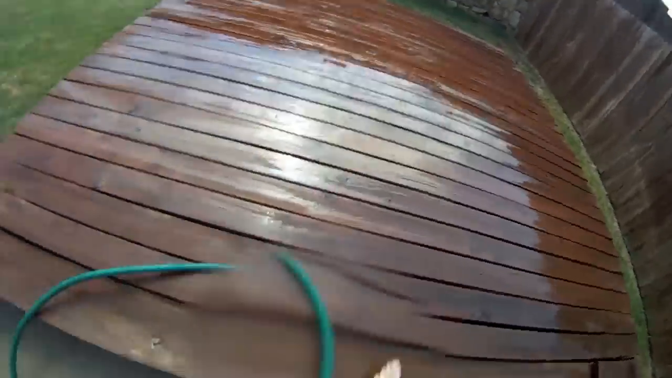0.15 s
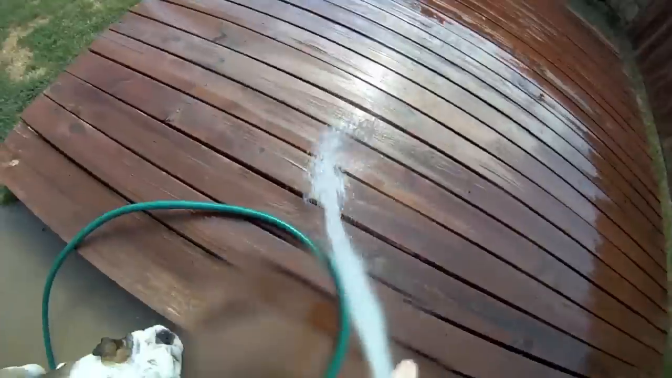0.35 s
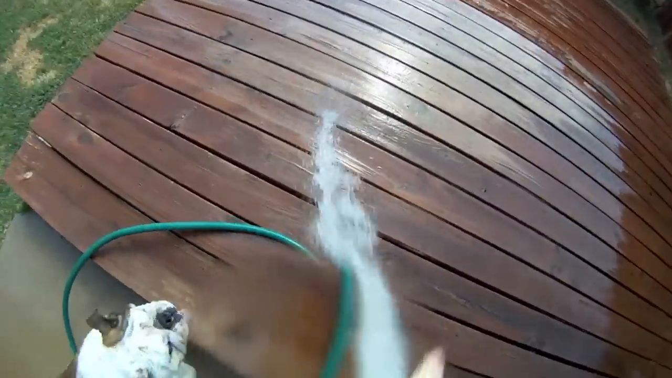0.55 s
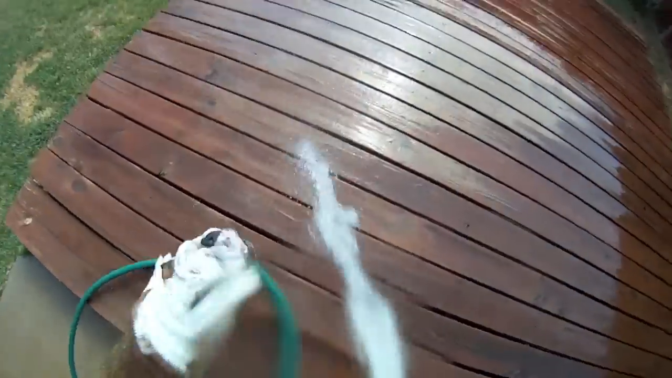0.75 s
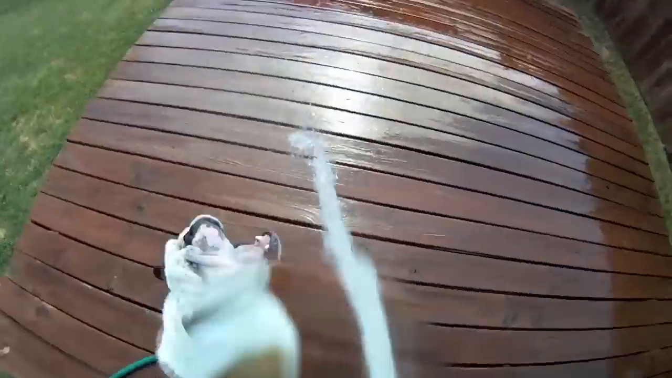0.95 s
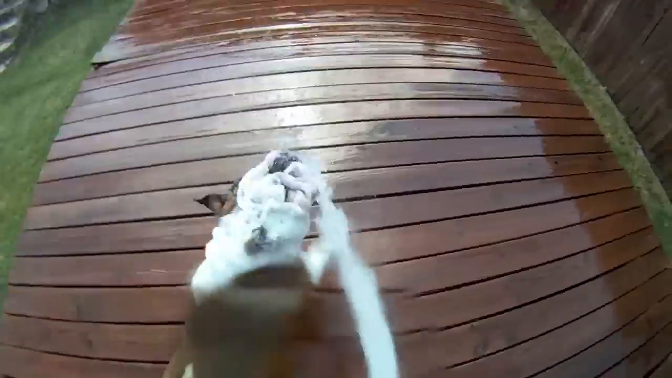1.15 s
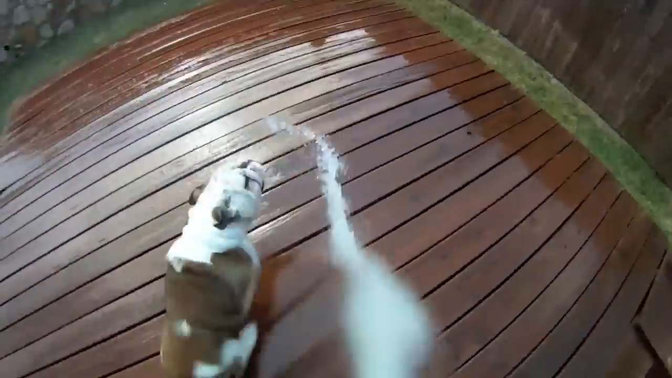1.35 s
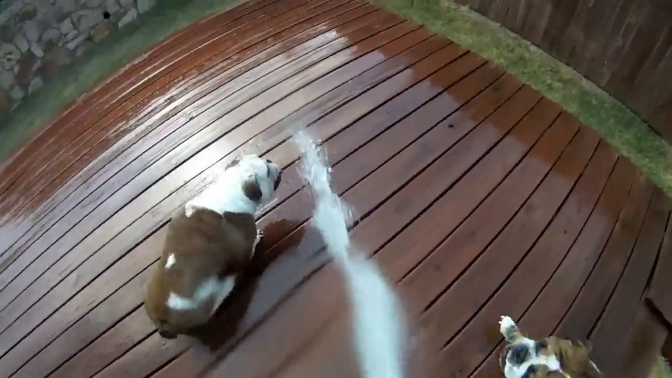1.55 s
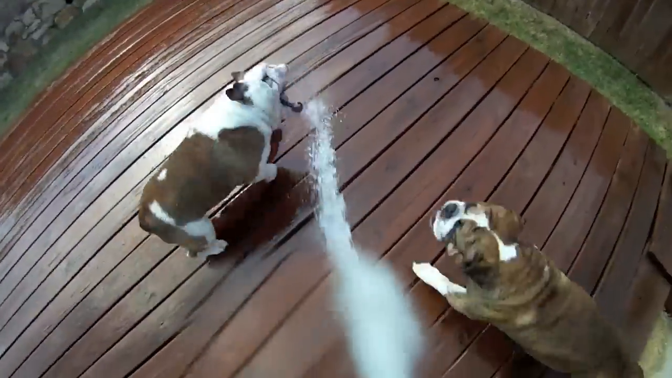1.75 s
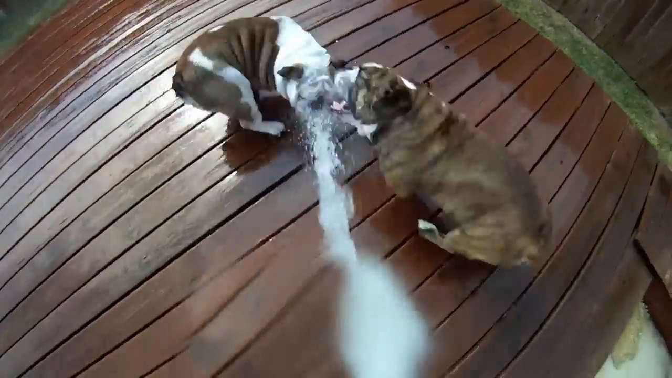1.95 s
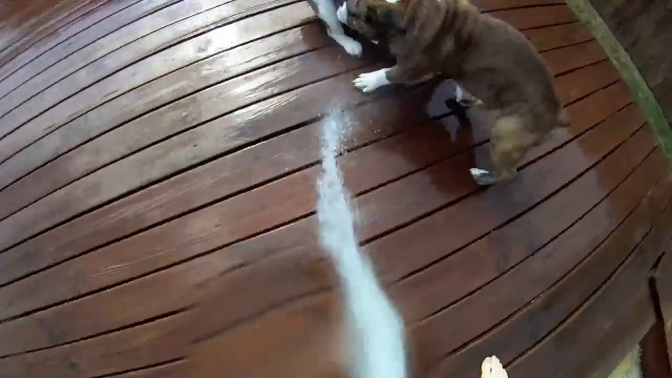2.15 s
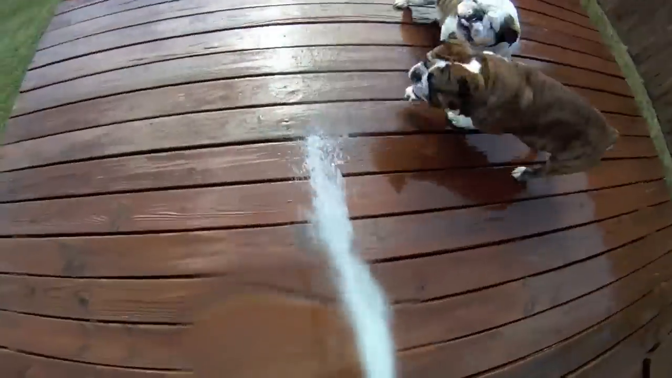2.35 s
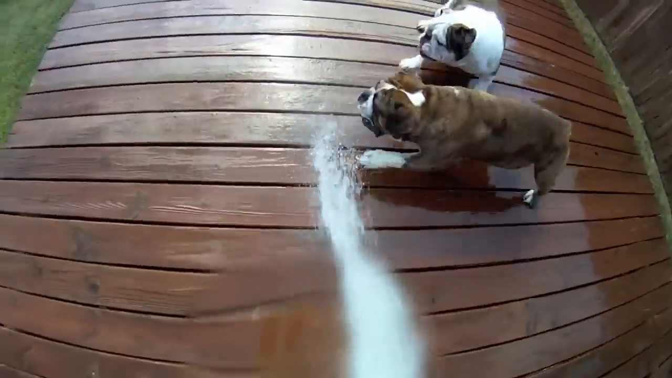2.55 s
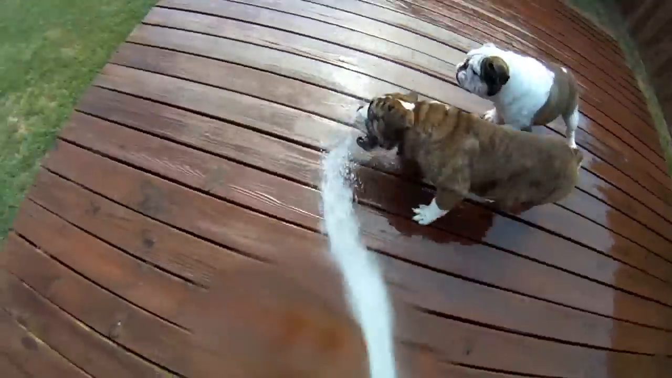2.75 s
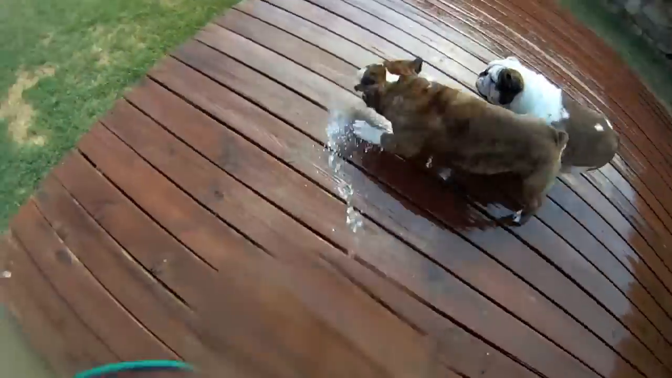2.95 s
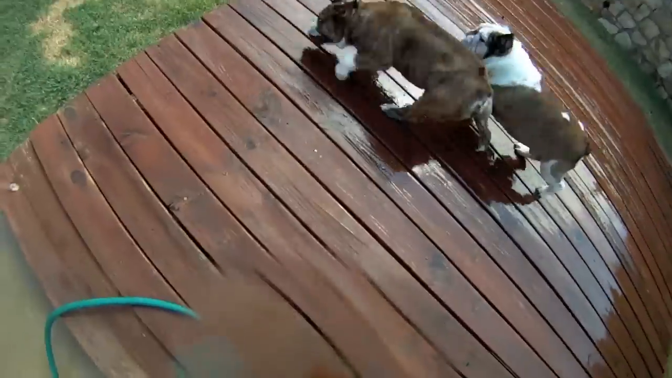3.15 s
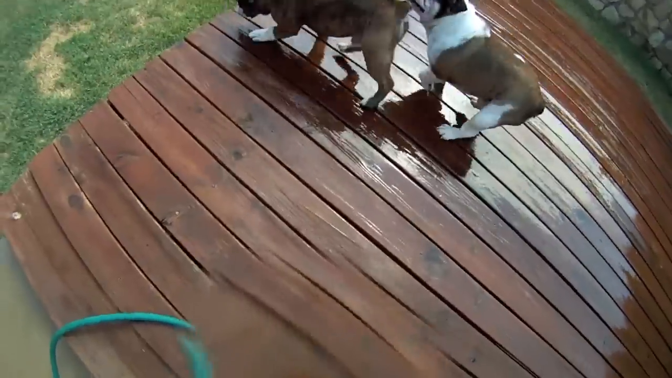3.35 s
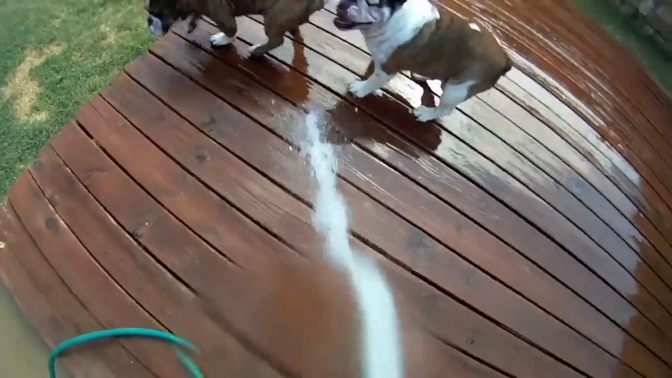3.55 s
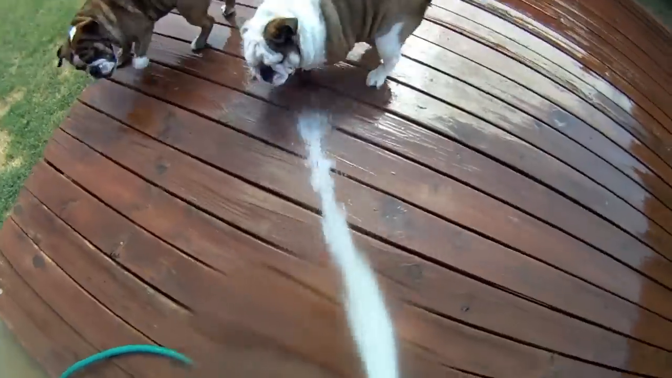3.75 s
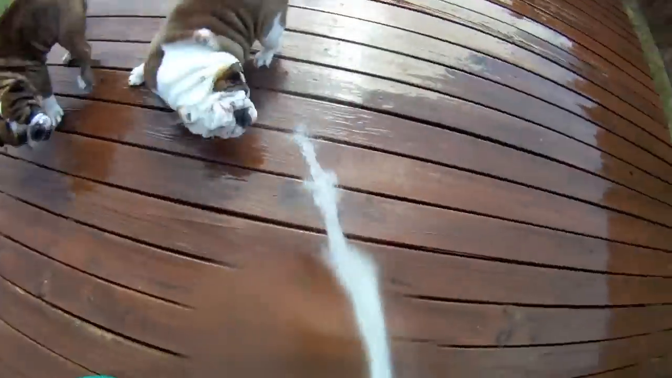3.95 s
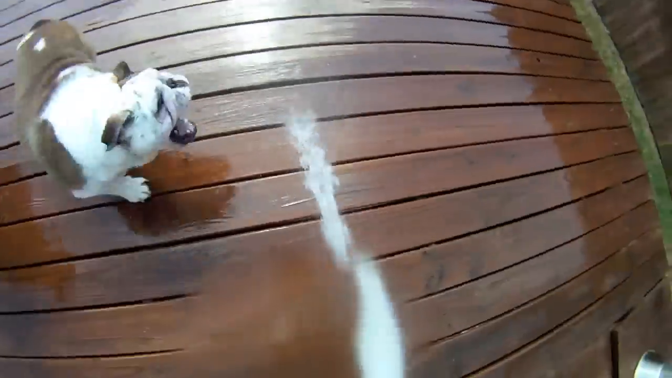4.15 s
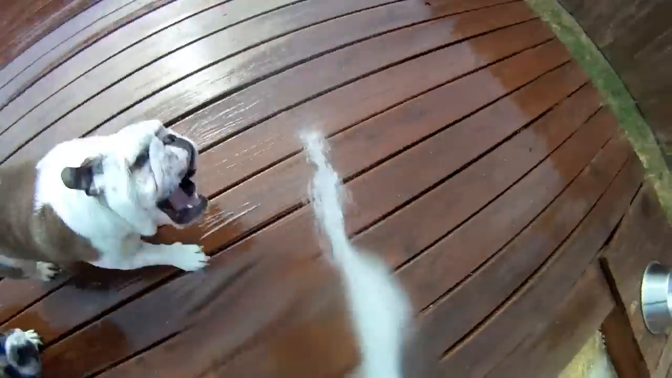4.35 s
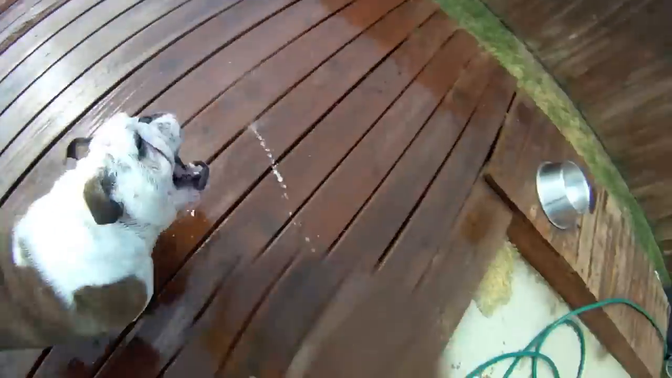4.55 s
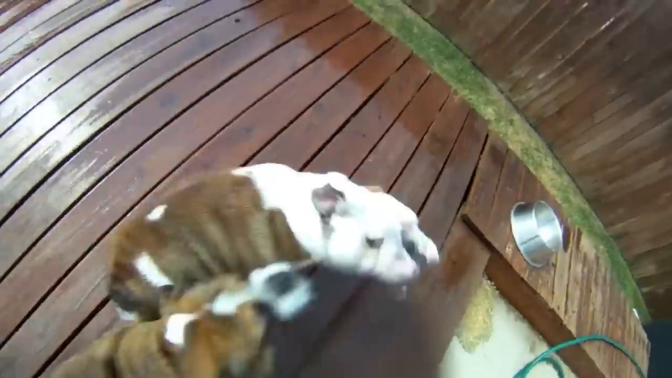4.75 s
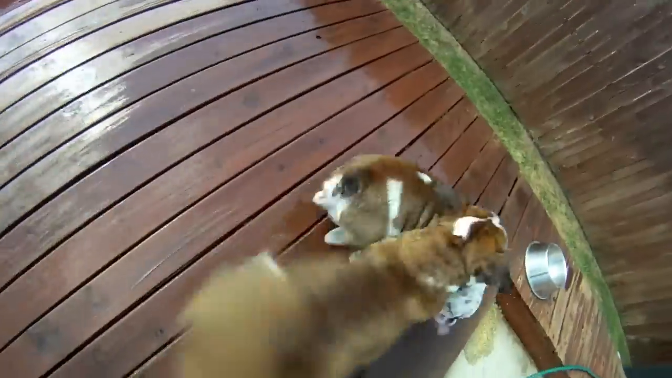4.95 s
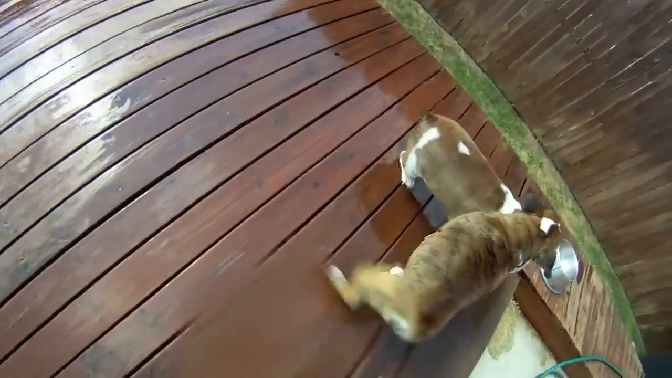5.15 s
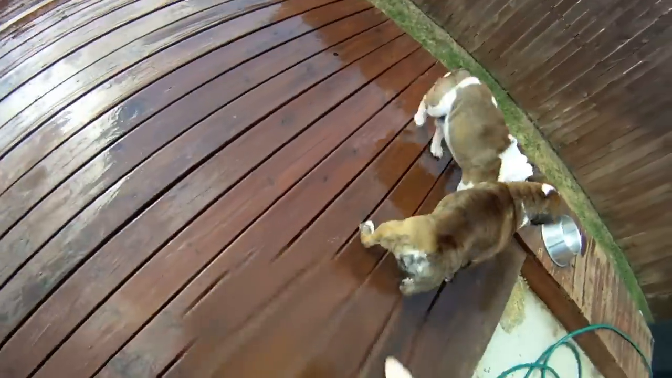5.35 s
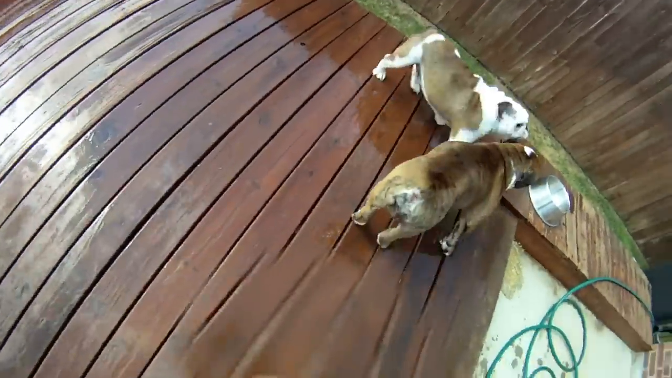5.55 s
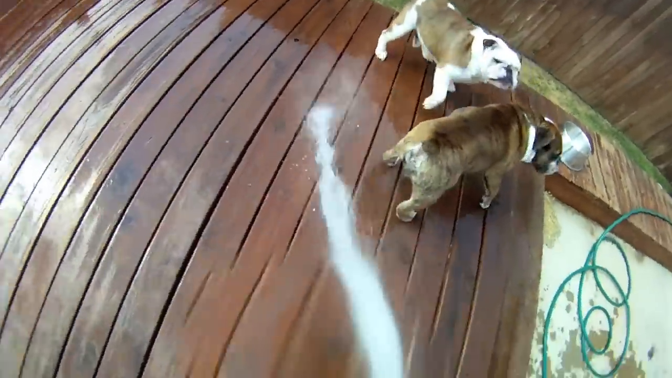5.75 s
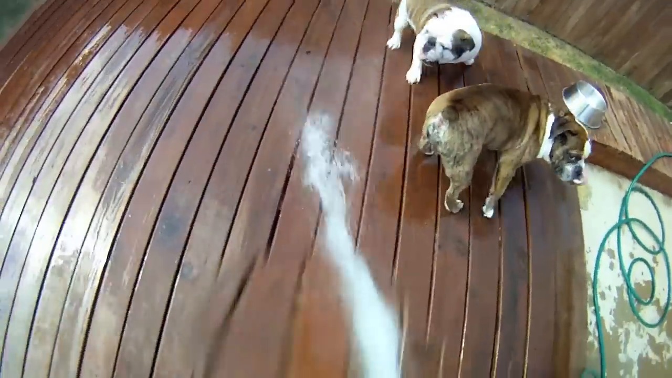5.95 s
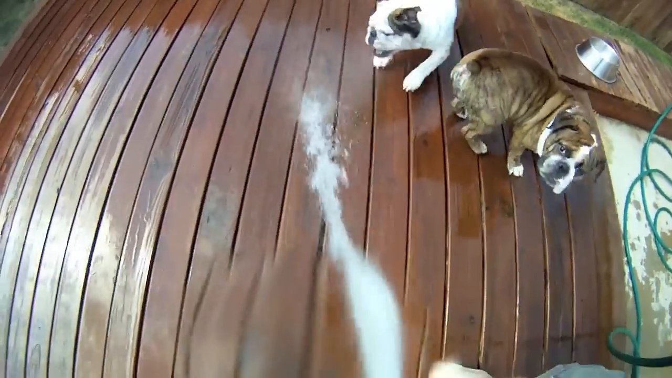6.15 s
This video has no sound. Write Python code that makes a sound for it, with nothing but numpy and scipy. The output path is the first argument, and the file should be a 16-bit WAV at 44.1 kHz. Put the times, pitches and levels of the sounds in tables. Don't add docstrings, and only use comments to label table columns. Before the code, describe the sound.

A rough, boxy close-up from a microphone attached to a hose nozzle in a sealed case, outdoors on a wooden deck. From 0 to 0.25 s there are sharp trigger clicks, low grip knocks and a faint hum. At about 0.26 s the valve opens with a spit and surge; more hard snaps at 0.31 and 0.36 s briefly duck the sound before a steady, hollow hiss with low hose shaking continues. Around 2.95 s the flow pinches, spurts, and slams shut at 3.0 s with a short ringing thump. Faint drips and claw ticks follow. A second spray runs 3.53 to 4.56 s, with a loud click at 3.59 s, ending in another slam. The quiet pause holds tiny ticks, soft knocks near 5.25 s and a slight distant rush near 5.47 s. At 5.68 s the strongest surge bursts out, snaps at 5.73 s and hisses to the end.

```python
import sys
import numpy as np
from scipy import signal
from scipy.io import wavfile

SR = 44100
rng = np.random.default_rng(int(sys.argv[2]) if len(sys.argv) > 2 else 0)


def attenuation_scalar(level_db):
    decades = np.asarray(level_db, float) / 20
    return 10 ** decades


def transcribe(u):
    v = np.clip(np.atleast_2d(u).T, -1, 1)
    q = np.round(v * 32767).astype(np.int16)
    wavfile.write(sys.argv[1], SR, q)


N = 273861

# centre_hz, width_hz, level_db
BOARDS = [(1600, 890, -14.5), (2295, 340, -1), (2960, 240, -8.5), (3720, 410, -11), (4700, 530, -18.5),
          (5300, 600, -18.5)]
# open_s, shut_s, full_flow_db, surge_after_s, surge_over_full_flow_db
SPRAYS = [
    (.262, 2.993, -15.5, 0.017, -2.5),
    (3.53, 4.561, -14.5, .035, -1),
    (5.68, 6.3, -14.5, 0.029, 4.5),
]
# time_s, suction_db, ring_db, final_ring_hz, ring_t60_s
SLAMS = [
    (2.994, -3.5, 0.5, 1015, 0.026),
    (4.561, -2.5, -3.5, 967, 0.043),
]


def rms_one(x):
    return x / np.sqrt(np.mean(x ** 2) + 1e-20)


def ramp(points, levels):
    return np.interp(np.arange(N) / SR, points, levels)


def fading(s, tau):
    u = (np.arange(N) / SR - s) / tau
    return (u >= 0) * np.exp(-np.abs(u))


def drift(rate):
    r = np.exp(-2 * np.pi * rate / SR)
    noise = rng.standard_normal(N + SR)
    return rms_one(signal.lfilter([1], [1, -2 * r, r * r], noise)[SR:])


def resonate(modes, flicker_db):
    white, out = rng.standard_normal(N), 0
    together = drift(55.0) + 0.4 * drift(6.0)
    for k, (hz, width, db) in enumerate(modes):
        r = np.exp(-1.5 * np.pi * width / SR)
        section = [(1 - r * r) / 2, 0, (r * r - 1) / 2, 1, -2 * r * np.cos(2 * np.pi * hz / SR), r * r]
        gain = attenuation_scalar(db + flicker_db * (together + 0.83 * drift(13.0)))
        out = out + (-1) ** k * gain * signal.sosfilt([section, section], white)
    return rms_one(out)


def drops(bustle_db):
    drops_per_s, spread_db = 250, 4.5
    sizes = attenuation_scalar(spread_db * np.minimum(rng.exponential(1, N), 4)) * rng.choice([-1, 1], N)
    falls = rng.random(N) < drops_per_s * attenuation_scalar(2 * bustle_db) / SR
    born = sizes * falls + 1e-18
    out, dealt = 0, rng.integers(0, 2, (len(BOARDS), N))
    for (hz, width, db), some in zip(BOARDS, dealt):
        r = np.exp(-np.pi * width / SR)
        poles = [1, -2 * r * np.cos(2 * np.pi * hz / SR), r * r]
        out = out + attenuation_scalar(db) * signal.lfilter([1 - r, 0, r - 1], poles, born * some)
    return rms_one(out)


def yard():
    # centre_hz, width_hz, level_db
    hum_modes = [(330, 200, -1.5), (550, 390, -11), (885, 620, 0), (1050, 40, -8), (1140, 18, 4.5),
                 (1250, 190, -7)]
    # centre_hz, width_hz, level_db
    hand_modes = [(26, 24, 7), (55, 37, -0.5), (111, 45, -1.5), (180, 95, -31)]
    # centre_hz, width_hz, level_db
    case_hum = [(1146, 30, 0.1), (1000, 150, -14)]
    # centre_hz, width_hz, level_db
    rush_modes = [(920, 260, 2), (1250, 200, -4), (1550, 344, -7)]
    # start_s, end_s, drips_and_paws_db, far_hum_db, hand_rumble_db
    pauses = [
        (0, 0.258, -53, -46.5, -28.5),
        (2.998, 3.52, -57.5, -59, -43),
        (4.572, 5.677, -60, -60, -44.5),
    ]
    # time_s, level_db
    swell = [
        (5.44, -66),
        (5.47, -53.5),
        (5.63, -57),
        (5.68, -64),
    ]
    # time_s, level_db
    bustle = [(0, -5), (.17, 2.5), (3.03, -6.5), (3.08, 2), (3.33, 0), (3.42, -8), (3.5, -3), (4.6, -1),
              (4.66, 4.5), (4.76, 0.5), (4.86, 4.5), (4.97, -2), (5.19, 1), (5.3, -2), (5.43, -1),
              (5.48, 0), (5.6, -1)]

    t, drip, hum, hand = np.arange(N) / SR, 0, 0, 0
    bustle_db = ramp(*np.transpose(bustle))
    for start, end, drip_db, hum_db, hand_db in pauses:
        gate = ramp([start - 0.006, start, end, end + 0.006], [0, 1, 1, 0])
        squeeze_db = 10.5 * fading(end + 0.0054, -0.017)
        jolt_db = 10 * fading(start - 0.006, 0.019)
        settle_db = 9 * fading(start, 0.15)
        drip = drip + gate * attenuation_scalar(drip_db + bustle_db)
        hum = hum + gate * attenuation_scalar(hum_db + squeeze_db)
        hand = hand + gate * attenuation_scalar(hand_db + jolt_db + settle_db + squeeze_db)
    s, db = np.transpose(swell)
    rush = (t > s[0]) * (t < s[-1]) * attenuation_scalar(ramp(s, db))
    tail = attenuation_scalar(-46) * sum(fading(slam[0], 0.046) for slam in SLAMS)

    patch_db = 0.9 + 1.0 * drift(4.0)
    floor = drip * attenuation_scalar(patch_db) * resonate(BOARDS, flicker_db=1.6)
    floor += hum * resonate(hum_modes, flicker_db=-1.0)
    floor += hand * attenuation_scalar(1.5) * resonate(hand_modes, flicker_db=2.5)
    floor += rush * resonate(rush_modes, flicker_db=1.0)
    floor += tail * resonate(case_hum, flicker_db=-2.0)
    return floor + drip * attenuation_scalar(-8.5) * drops(bustle_db)


def knocks():
    # time_s, peak_db, rise_ms
    pushes = [(.021, 3, 3.9), (0.077, -2, 3.7), (0.083, -7, 6.4), (0.209, -4.5, 4.8), (2.919, -10, 9),
              (3.537, -7, 7.4), (3.554, -14, 7.8), (4.5152, -12, 7.2), (4.542, -14, 5.9), (4.926, -32, 7.8),
              (4.991, -30.5, 5.5), (5.102, -35, 3.1), (5.272, -19.5, 9.4), (5.689, -8, 9),
              (5.705, -8.5, 2.1)]
    # time_s, peak_db, rise_ms
    pulls = [(0.052, -7, 5.1), (0.266, -3, 7.5), (.309, -6, 3.1), (0.363, -1, 3.1), (3.589, 4.5, 2.2),
             (5.253, -10.5, 6.6), (5.291, -27, 29), (5.37, -33.5, 10.4), (5.733, -3, 2.6)]
    grip_hz, slack_ms = 135.3, 28
    out, t = np.zeros(N), np.arange(SR // 5) / SR
    for sign, rows in ((1, pushes), (-1, pulls)):
        for s, db, rise_ms in rows:
            u = t * 1000 / rise_ms
            hz = grip_hz * np.exp(-rise_ms / slack_ms)
            swell = (u * np.exp(1 - u)) ** 2.05
            out[round(s * SR):][:len(t)] += sign * attenuation_scalar(db) * swell * np.sin(2 * np.pi * hz * t)
    return out


def clicks():
    # pitch_hz, t60_s, level_db, colour_group (0 body, 1 low, 2 high, 3 top)
    snap = [(2190, 0.0087, 1, 0), (1920, 0.014, -11, 2.5), (2610, 0.01, -14, 0.5), (3150, 0.012, -8, 2),
            (877, 0.019, 3.5, 1), (1330, 0.011, -10.5, 0), (506, 0.029, -6.5, 1), (256, 0.055, -4, 1),
            (3600, 0.0077, 3, 2), (4800, 0.0027, -19, 3)]
    # time_s, peak_db, rel_900_hz_db, rel_3700_hz_db, length_ms
    trigger = [(.0025, -13, -17, -27, 1.4), (0.0197, 1.5, -3.5, -11.5, 4.2), (0.051, -20, -2, -19, 6),
               (.074, -2, -6, -18, 2.5), (.081, -25, 11, -6, 8.5), (.2075, -29, -7, -24, 7.6),
               (.308, 2.5, -14, -19, 2.8), (.361, 4.5, -5.5, -10, 2.4), (2.939, -8.5, -35, -3.5, 1.8),
               (2.9944, -18.5, -15, 2.5, 3.1), (3.523, -16.5, -10.5, -13, 2.9),
               (3.587, 3.5, -8.5, -16, 1.2), (4.523, -13, -26, 0, 2.3), (4.991, -29, -12, -24, 1.6),
               (5.663, -18, -22, -8.5, 3.3), (5.731, 5.5, -13, -21, 2.2)]
    # time_s, peak_db, rel_900_hz_db, rel_3700_hz_db
    claws = [(.037, -31, -1.5, -11), (.17, -44, -15, 1), (3.102, -46, -12.5, 3), (3.187, -57, 13, -8),
             (3.255, -46, -14, -7), (3.467, -45, -14, -20), (3.474, -45, -11, -17), (4.697, -43, -12, -10),
             (4.769, -44.5, -7, -8), (4.84, -44, -23, -6), (4.906, -48, -10, -2), (5.099, -43, -4, -20),
             (5.152, -41.5, -17, -9), (5.184, -45.5, -21, -7), (5.2517, -59, 16, -5), (5.324, -51, -13, -3)]
    claw_ms, claw_top_db = 4.9, -7

    out, t = np.zeros(N), np.arange(SR // 20) / SR
    soft = (1 - np.exp(-t / 0.00023)) ** 2
    rows = []
    for s, db, low, high, ms in trigger:
        top = max(-19 + 0.9 * db, -33)
        rows.append((s, db, low, high, top, ms))
    rows += [(s, db, low, high, high + claw_top_db, claw_ms) for s, db, low, high in claws]
    for s, db, low_db, high_db, top_db, ms in rows:
        length_s = abs(ms) / 1000 + 1e-4
        contacts = rng.standard_normal(SR // 100) * np.exp(-(t[:SR // 100] / length_s) ** 4)
        contacts[:3] += 3.5
        colour_db, burst = (0, low_db, high_db, top_db), 0
        for hz, t60, mode_db, group in snap:
            ring = soft * attenuation_scalar(-60 * t / t60) * np.sin(2 * np.pi * hz * t)
            rung = np.convolve(contacts, ring)[:len(t)]
            burst = burst + attenuation_scalar(db + mode_db + colour_db[round(group)]) * rung / np.abs(rung).max()
        out[round(s * SR):][:len(t)] += burst
    return out


def valve():
    out, t, lead = np.zeros(N), np.arange(SR // 10) / SR, SR // 50
    for s, suction_db, ring_db, hz, t60 in SLAMS:
        at = round(s * SR)
        out[at - lead:at] -= attenuation_scalar(suction_db) * np.exp(-t[lead:0:-1] / 0.0028)
        pitch = hz * (1 - 0.85 * np.exp(-t / 0.00092))
        out[at:][:len(t)] -= attenuation_scalar(ring_db - 60 * t / t60) * np.cos(2 * np.pi * np.cumsum(pitch) / SR)
        out[at:][:len(t)] += attenuation_scalar(suction_db - 6.5 - 60 * t / 0.12) * np.sin(2 * np.pi * 55 * t)
    return out


def valve_travel(edge_s):
    # time_s, level_db
    pressure = [(.5, 1), (1.3, -1.1), (1.8, -0.6), (2.3, 0.5), (2.7, 0.06), (3.9, 1.2), (4.3, -1.2),
                (6.2, 0.3)]
    # pinch_s, dip_db, last_spurt_s, spurt_db
    pinches = [
        (2.952, -8.5, 2.987, 4.5),
        (4.528, -3.5, 4.55, 7.5),
    ]
    crack_open_db, surge_fall_s, half_open_db, full_after_s = -15.5, 0.019, -5, 0.11
    spit_db, spit_open_s, spit_shut_s = 17, 0.009, 0.0087
    pinch_s, spurt_s = 0.017, 0.0096

    gate, hiss_db = 0, ramp(*np.transpose(pressure))
    rumble_db, sputter_db = -8, -25
    for on, off, flow_db, surge_s, surge_db in SPRAYS:
        peak = on + surge_s
        times = [on, peak, peak + surge_fall_s, on + full_after_s]
        inside = ramp([on - edge_s, on, off, off + edge_s], [0, 1, 1, 0])
        gate = gate + inside
        opening_db = ramp(times, [crack_open_db, surge_db, half_open_db, 0])
        hiss_db = hiss_db + (inside > 0) * (flow_db + opening_db)
        rumble_db = rumble_db - 7 * fading(on - edge_s, 0.12)
        spit = fading(peak, spit_open_s)
        spit = spit + ramp([on - edge_s, on, peak, peak], [0, 1.1, 1, 0.031])
        spit = spit + fading(off + edge_s, -spit_shut_s - edge_s)
        sputter_db = sputter_db + spit_db * spit
    for pinch, dip_db, spurt, spurt_db in pinches:
        hiss_db = hiss_db + ramp([pinch - pinch_s, pinch, pinch + pinch_s], [0, dip_db, 0])
        hiss_db = hiss_db + ramp([spurt - spurt_s, spurt, spurt + spurt_s / 2], [0, spurt_db, 0])
    return gate, hiss_db, rumble_db, sputter_db


def jet():
    # centre_hz, width_hz, level_db
    case_modes = [(479, 85, -10), (669, 85, -19), (931.5, 131, -0.5), (1217.5, 85, -5), (1554, 166, -3.5),
                  (1956, 223, -0.5), (2359, 172, 0), (2908, 140, -9.5), (3237, 265, -19.5),
                  (3514, 79, -18.5), (3765, 200, -16.5)]
    # centre_hz, width_hz, level_db
    sputter_modes = [(3980, 200, -9), (4500, 310, 6), (5330, 810, 2)]
    # centre_hz, width_hz, level_db
    hose_modes = [(44.3, 25.6, -5), (75, 45.5, -0.5), (111, 38.8, 4.5), (157, 64, -13.5),
                  (211.5, 31.5, -13.5), (333, 55, -20)]
    gate, hiss_db, rumble_db, sputter_db = valve_travel(edge_s=0.0061)
    hiss = resonate(case_modes, flicker_db=0.09)
    top = attenuation_scalar(sputter_db - 9) * resonate(sputter_modes, flicker_db=1.4)
    hose = attenuation_scalar(rumble_db) * resonate(hose_modes, flicker_db=1.4)
    trapped_air = sum(fading(spray[0], 0.1) for spray in SPRAYS)
    spurts_db = 3 * drift(70) * trapped_air
    return gate * attenuation_scalar(hiss_db) * (attenuation_scalar(spurts_db) * (hiss + top) + hose)


def scene():
    return (yard() + knocks() + clicks() + valve() + jet())[None]


def gain_control():
    # time_s, depth_db
    ducks = [(0.023, 12), (0.3097, 7.5), (3, 11.5), (4.567, 9), (0.3663, 13.5), (3.5892, 12.5),
             (5.7344, 13.5)]
    attack_s, recover_s = 0.00069, 0.13
    t, db = np.arange(N) / SR, 0
    for s, depth_db in ducks:
        since = np.maximum(t - s, 0)
        db = db - depth_db * (1 - np.exp(-since / attack_s)) * np.exp(-since / recover_s)
    return attenuation_scalar(db)


def low_pass(x):
    return signal.sosfilt(signal.butter(12, 16520, fs=SR, output="sos"), x)


def record(dry):
    slow = signal.resample_poly(dry * gain_control(), 40, 147, axis=1)
    slow = np.clip(slow, -0.86, 0.86)
    held = np.repeat(slow, 4, axis=1)
    held = signal.resample_poly(held, 147, 160, axis=1)[:, :N]
    top_cut = signal.ellip(10, 0.1, 28, 15230, fs=SR, output="sos")
    return low_pass(signal.sosfiltfilt(top_cut, held))


dry = scene()
out = record(dry)
transcribe(out)
```